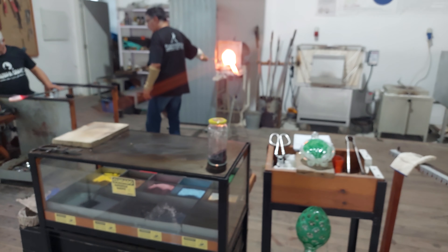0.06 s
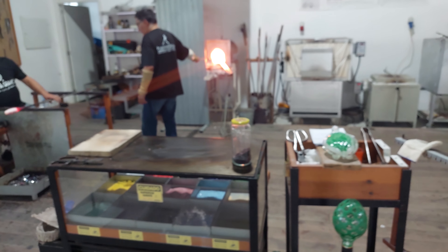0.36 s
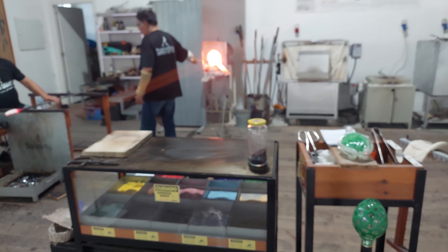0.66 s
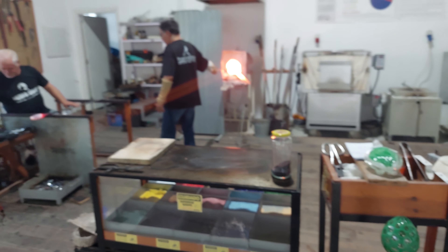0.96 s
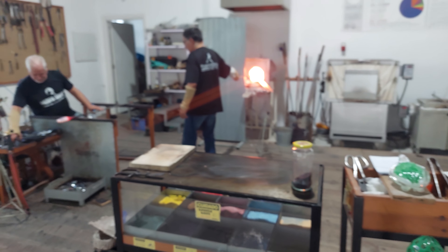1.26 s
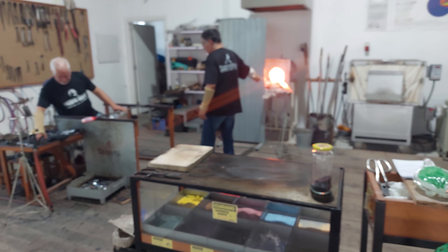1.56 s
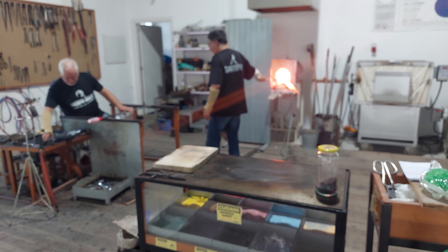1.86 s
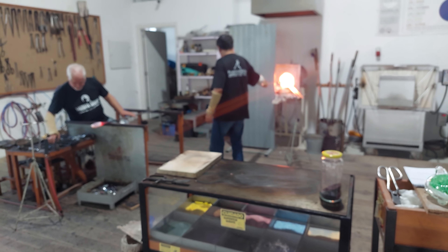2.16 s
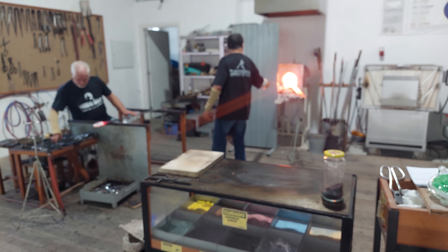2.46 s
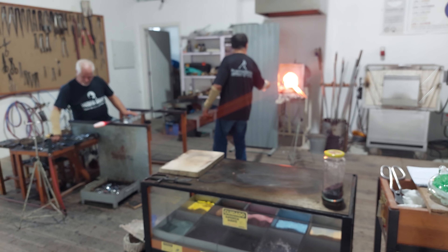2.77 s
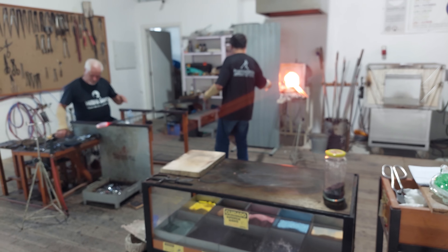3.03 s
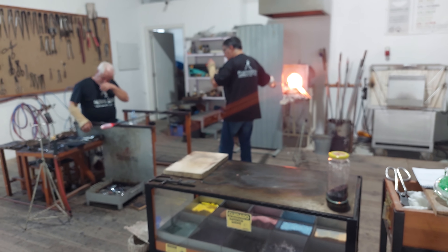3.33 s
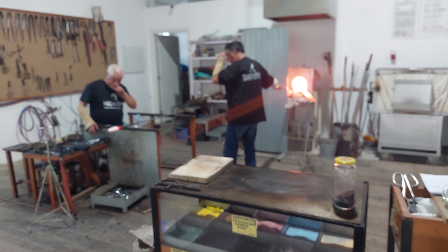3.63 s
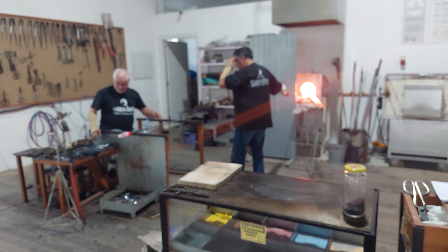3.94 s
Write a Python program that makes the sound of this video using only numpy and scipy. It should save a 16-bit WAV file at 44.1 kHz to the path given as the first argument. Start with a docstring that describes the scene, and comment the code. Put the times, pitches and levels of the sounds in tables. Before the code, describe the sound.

A gas furnace roars throughout the four seconds, a low, fluttering boom with a light burner hiss in a hard-walled workshop. Faint sliding swishes pass in the first second. A steel tool clinks down at 1.4 seconds, and wood thumps and bounces at 1.8, with two more soft swishes. Lighter wooden knocks come at 2.9 seconds, then a brighter, ringing tool clink at 3.1.

```python
"""A gas furnace roars all through this scene in a hard-walled glassblowing workshop: its flame makes
the chamber and the room boom, and its burner air hisses. At first a steel tool is still ringing
faintly, and something slides with soft swishes. A tool clinks as it is put down (1.4 s), then wood
thumps and bounces (1.8 s), with two more swishes. Near the end come lighter wooden knocks (2.9 s)
and the clink of a brighter tool (3.1 s)."""
import sys
import numpy as np
from scipy import signal
from scipy.fft import rfft, irfft, next_fast_len
from scipy.io import wavfile
from scipy.ndimage import uniform_filter1d, map_coordinates

SR = 44100
rng = np.random.default_rng(int(sys.argv[2]) if len(sys.argv) > 2 else 0)


def master(y):
    """Save y as 16-bit WAV."""
    cut = np.clip(np.atleast_2d(y).T, -1, 1)
    pcm = np.round(cut * 32767)  # scale
    wavfile.write(sys.argv[1], SR, pcm.astype(np.int16))


N = 176400


def furnace_boom(trim_db=-3, steadying=0.09, window_s=0.053):
    """The flame stirs the low notes at which the chamber and the room like to ring."""
    # strength of the flame: t/s, level/dB
    flame = [(0, -25.5), (0.159, -15.5), (0.359, -17.5), (0.56, -19), (0.8, -20), (1.08, -18), (1.3, -22.5),
             (1.58, -16.5), (1.84, -17.5), (2.2, -21), (2.579, -21), (2.85, -19.5), (3.06, -20),
             (3.27, -15), (3.45, -20.5), (3.72, -20), (3.95, -16.5)]
    # low notes of the chamber and room: f/Hz, width/Hz, level/dB
    notes = [(50.5, 2.1, 0.5), (65.7, 8.9, -0.5), (123, 10.7, 2), (138.2, 14.8, 5.5), (165.5, 7.8, -3),
             (183.8, 10.5, 0), (200.7, 5.7, 0.5), (239.6, 26, -12.5), (296, 23, -13.5), (446.3, 19, -16.5)]
    flame_db = np.interp(np.arange(N) / SR, *np.transpose(flame))
    power = lambda f: sum(amp(2 * db) / (1 + ((f - hz) / width) ** 2) ** 3 for hz, width, db in notes)
    boom = room_noise(lambda f: np.sqrt(power(f)))
    loudness = np.sqrt(np.abs(uniform_filter1d(np.mean(boom ** 2, axis=0), int(window_s * SR))))
    steadier = boom / loudness ** steadying  # the boom limits its own swings a little
    return amp(flame_db + trim_db) * unit(steadier)


def flame_rush(level_db=-27):
    """The burning gas makes a broad, low rush that flutters quickly and swells slowly."""
    # tone of the rush: f/Hz, level/dB
    colour = [(25, -26.5), (36, -14), (50, -13.5), (90, -0.5), (200, -2.5), (320, -6), (420, -13),
              (570, -18.5), (680, -16.5), (850, -18), (1200, -30), (2000, -42), (4000, -64.5)]
    flutter_db = 0.5 * wobble(rate=14)
    swell_db = -1.93 * wobble(rate=0.65)
    return amp(level_db + flutter_db + swell_db) * room_noise(lambda hz: amp(along(colour, hz)))


def burner_hiss(level_db=-49):
    """Air streams through the burner with a slightly wavering hiss."""
    # tone of the hiss: f/Hz, level/dB
    colour = [(500, -16.5), (1200, 2), (2000, 3), (3100, -8), (5000, -10), (6300, -13.5), (7700, -17.5),
              (9000, -26), (11000, -27), (12200, -19), (13500, -29.5)]
    waver_db = 0.63 * wobble(rate=5.4)
    return amp(level_db + waver_db) * room_noise(lambda hz: amp(along(colour, hz)))


def wooden_knocks():
    """Wood hits wood across the room and bounces: each blow is a dull thud and a dry clack."""
    # blows: t/s, thud/dB, clack/dB
    blows = [(1.824, -22, -40.5), (1.835, -22, -33), (1.845, -28.5, -40.5), (1.935, -32, -40.5),
             (2.907, -39.5, -40), (2.927, -48, -43), (2.995, -50, -43.5)]
    # tone of the thud and of the clack: f/Hz, level/dB
    thud_colour = [(30, -30.5), (60, 3), (280, 2), (650, -1), (1350, -10.5), (1650, -21.5), (8000, -59.5)]
    clack_colour = [(700, 2.5), (2300, 1.5), (3300, -13), (4000, -12.5), (4700, -8.5), (6000, -17.5),
                    (9000, -31)]
    out = np.zeros((2, N))
    for s, thud_db, clack_db in blows:
        thud = amp(thud_db) * burst(thud_colour, t60=0.05)
        clack = amp(clack_db) * burst(clack_colour, t60=0.04)
        add(out, s, workshop_echo(thud + clack, wet_db=2))
    return out * panned(-3.5)


def steel_tools():
    """Two steel tools are put down, one lower and one higher; a faint third rings from the start."""
    # notes each tool rings with: f/Hz, level/dB, t60/s (time to fade by 60 dB)
    low_notes = [(4474, -5, .4), (4845, -7, .5), (5281, -6, .55), (5846, -1.5, .55), (5970, -1.5, .85),
                 (6380, -6, .3), (6476, -5, .5), (6610, -5, .5), (7224, -8, .3), (7456, -8, .35),
                 (7630, -6, .55), (8130, -8, .28), (10820, -14, .2), (11280, -13, .2)]
    high_notes = [(4161, -3, 1.25), (4210, -0.5, 1.4), (4255, -3.5, .8), (5970, -7, .6), (7150, -7, .3),
                  (9798, -4, .18), (10650, -3.5, .18), (11840, -2, .2), (12140, 0, .2), (12630, -1, .12),
                  (12880, 0, .17), (13940, -4, .17), (14670, 0, .14), (15680, -1, .16)]
    faint_notes = [(1550, -2, .8), (7640, -9, .3)]
    # hits on the bench: t/s, ring/dB, chatter/dB, crack/dB
    low_hits = [(1.415, -55, -50.5, -38.5), (1.430, -61.5, -46, -44)]
    high_hits = [(3.090, -63.5, -46, -31), (3.097, -66, -57.5, -37.5), (3.111, -58.5, -56, -35.5)]
    faint_hits = [(-0.054, -48.5, -56, -64)]
    # tone of the crack of a hit: f/Hz, level/dB
    low_crack = [(1000, 1), (6500, 0.5), (8200, -4.5), (9500, -9), (16000, -12)]
    high_crack = [(1000, -3), (7000, -0.5), (10000, -8.5), (12500, -1), (16000, 0)]
    return (clinks(low_hits, low_notes, low_crack)
            + clinks(high_hits, high_notes, high_crack)
            + clinks(faint_hits, faint_notes, low_crack))


def clinks(hits, notes, crack_colour, chatter_t60=0.045):
    """Each hit cracks, blurs the tool's notes as it chatters on the bench, and leaves them ringing."""
    out, t = np.zeros((2, N)), np.arange(SR) / SR
    for s, ring_db, chatter_db, crack_db in hits:
        ring = sum(amp(db - 60 * t / t60) * tone(hz, waver_hz=20, rate=130) for hz, db, t60 in notes)
        chatter = sum(amp(db) * tone(hz, waver_hz=0.011 * hz, rate=600) for hz, db, _ in notes)
        chatter *= amp(chatter_db - 60 * t / chatter_t60)
        crack = amp(crack_db) * burst(crack_colour, t60=0.016)
        add(out, s, workshop_echo(amp(ring_db) * ring + chatter + crack, wet_db=1))
    return out


def swishes():
    """Something slides lightly: the rubbing makes a thin noise that swells and fades."""
    # slides: peak t/s, rise/s, fall/s, level/dB
    slides = [(.27, 0.21, 0.23, -67), (0.634, .02, 0.12, -61.5), (.785, 0.017, 0.14, -59.5),
              (1.86, 0.05, 0.085, -61), (2.115, 0.15, 0.12, -54.5)]
    # tone of the rubbing: f/Hz, level/dB
    colour = [(3000, -9.5), (6000, 3), (9500, -3), (12200, 2.5), (14000, -4), (16000, 4)]
    t = np.arange(N) / SR
    level = sum(amp(db) * np.exp(-((t - s) / np.where(t < s, rise, fall)) ** 2)
                for s, rise, fall, db in slides)
    roughness = amp(1.8 * wobble(rate=70))
    return level * roughness * np.array([noise(colour), noise(colour)])


def workshop_echo(x, wet_db, count=18, early_s=0.024, ear_lag_s=0.00039):
    """The sound itself, quick echoes off benches and floor, and a tail whose treble fades first."""
    # how long the room rings: f/Hz, t60/s
    fade_times = [(150, .9), (1000, 1.15), (4000, 1.1), (7000, .9), (12000, .52), (16000, .38)]
    hz, t, bands = signal.stft(room_noise(np.ones_like)[:, :SR], SR, nperseg=256)
    fade = amp(-60 * t / along(fade_times, hz)[:, None])
    tail = signal.istft(bands * fade, SR, nperseg=256)[1]
    echoes = amp(wet_db) * tail / np.linalg.norm(tail[0])
    delays = early_s * rng.random(count)
    gains = unit(rng.standard_normal(count)) / np.sqrt(count)
    for ear in echoes:
        arrivals = delays + ear_lag_s * rng.random(count)  # each echo reaches one ear first
        ear[(arrivals * SR).astype(int)] += gains
        ear[0] += 1  # the direct sound
    return signal.fftconvolve(x[None], echoes, axes=1)


def room_noise(response):
    """Noise that fills the room: both ears hear nearly the same bass but unrelated treble."""
    # how alike the two sides are: f/Hz, likeness (1 = the same)
    alike = [(60, .985), (140, .97), (290, .9), (640, .45), (1300, -.1), (3100, 0)]
    # how much louder the left side is: f/Hz, level/dB
    balance = [(60, -3.5), (130, -1.3), (700, -2), (1300, -3), (2200, -6.5), (3000, -1), (3700, 4),
               (5000, -0.5), (12000, -1.5), (15000, 0.5)]
    angle = lambda hz: np.arccos(np.clip(along(alike, hz), -1, 1)) / 2
    shares = lambda hz: np.array([np.cos(angle(hz)), np.sin(angle(hz))])
    mid, side = filtered(rng.standard_normal((2, N)), lambda hz: response(hz) * shares(hz))
    stereo = np.array([mid + side, mid - side])
    return unit(filtered(stereo, lambda hz: panned(along(balance, hz))))


def burst(colour, t60):
    """The noise of one hit, coloured by the thing it strikes and fading 60 dB in t60 seconds."""
    hz = np.fft.rfftfreq(SR, 1 / SR)
    # build a filter that makes no sound ahead of the hit
    cepstrum = irfft(np.log(unit(amp(along(colour, hz)))))
    body = np.exp(rfft(np.r_[cepstrum[0], 2 * cepstrum[1:SR // 2]], SR))
    crackle = rng.standard_normal(SR) * amp(-60 * np.arange(SR) / SR / t60)
    return irfft(body * rfft(crackle))


def tone(hz, waver_hz, rate):
    """One second of a note whose pitch wavers at random."""
    pitch = hz + waver_hz * wobble(rate, size=SR)
    return np.sin(2 * np.pi * (np.cumsum(pitch) / SR + rng.random()))


def noise(colour):
    """Steady noise with the given tone."""
    return unit(filtered(rng.standard_normal(N), lambda hz: amp(along(colour, hz))))


def wobble(rate, size=N):
    """A smooth curve through rate random points a second."""
    points = rng.standard_normal(int(size * rate / SR) + 4)
    return map_coordinates(points, [np.arange(size) * rate / SR])


def filtered(x, response):
    """Turn each frequency of x up or down by response(hz)."""
    size = next_fast_len(N + SR // 2)
    return irfft(rfft(x, size) * response(np.fft.rfftfreq(size, 1 / SR)), size)[..., :N]


def along(points, hz):
    """Read a table of (f/Hz, value) between its rows, on a log frequency scale."""
    f, values = np.transpose(points)
    return np.interp(np.log(hz + 1), np.log(f + 1), values)


def amp(db):
    """Turn decibels into a gain."""
    return 10 ** (np.asarray(db) / 20)


def unit(x):
    """Scale x to an average strength (rms) of 1."""
    return x / np.sqrt(np.mean(x ** 2) + 1e-20)


def panned(db):
    """Left and right gains, with the left louder by db."""
    return amp(np.array([[.5], [-.5]]) * db)


def add(out, s, x):
    """Mix x into out, starting at s seconds."""
    start = round(s * SR)
    x = x[:, max(-start, 0):N - start]
    out[:, max(start, 0):][:, :x.shape[1]] += x


def scene():
    """The furnace, with the work going on around it."""
    tools = steel_tools()
    furnace = furnace_boom() + flame_rush() + burner_hiss()
    return furnace + tools + wooden_knocks() + swishes()


def record(dry, top_hz=15900):
    """Cut away the very highest treble."""
    return filtered(dry, lambda hz: np.clip((top_hz - hz) / 250, 0, 1))


dry = scene()
out = record(dry)
master(out)
```